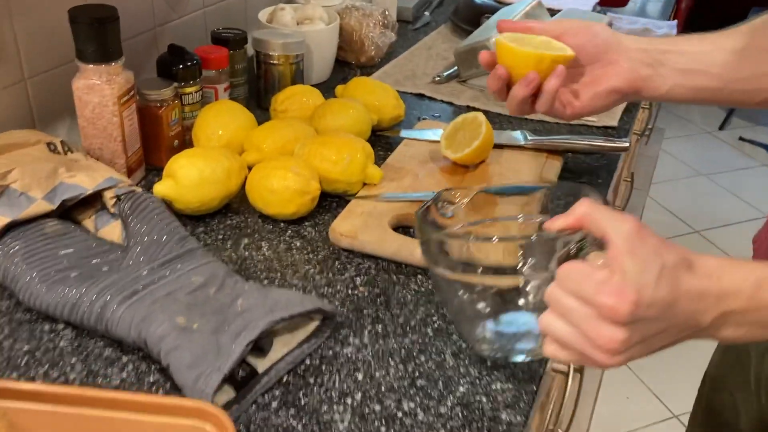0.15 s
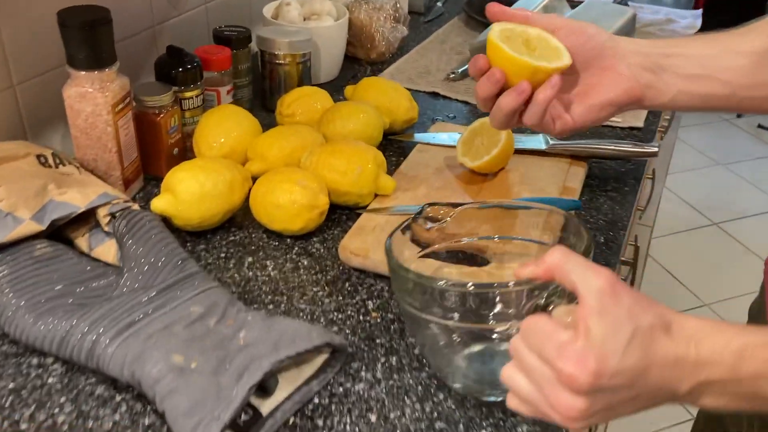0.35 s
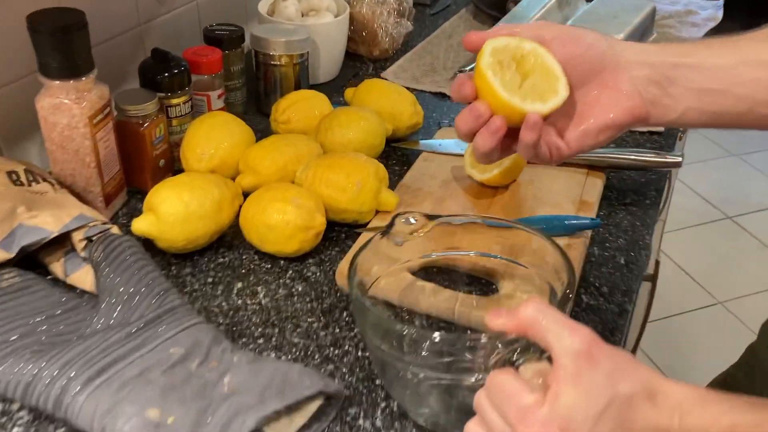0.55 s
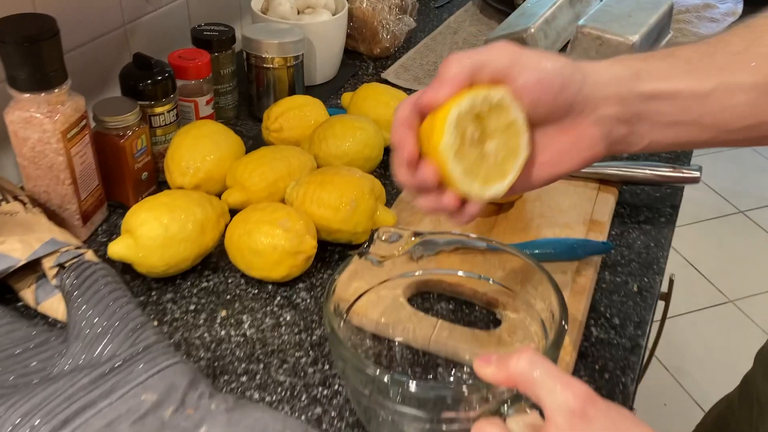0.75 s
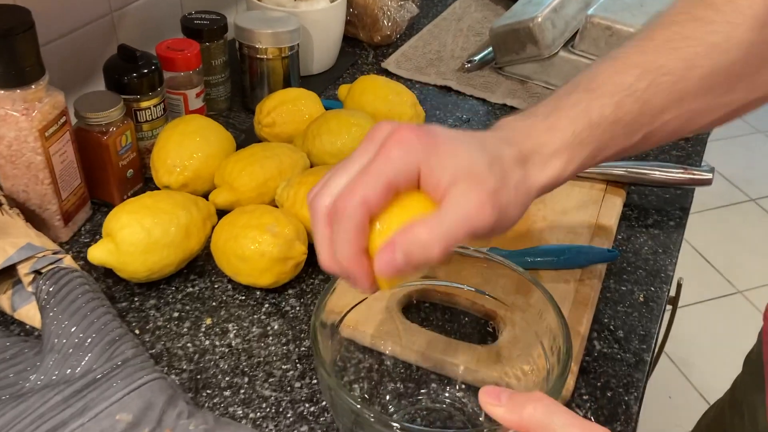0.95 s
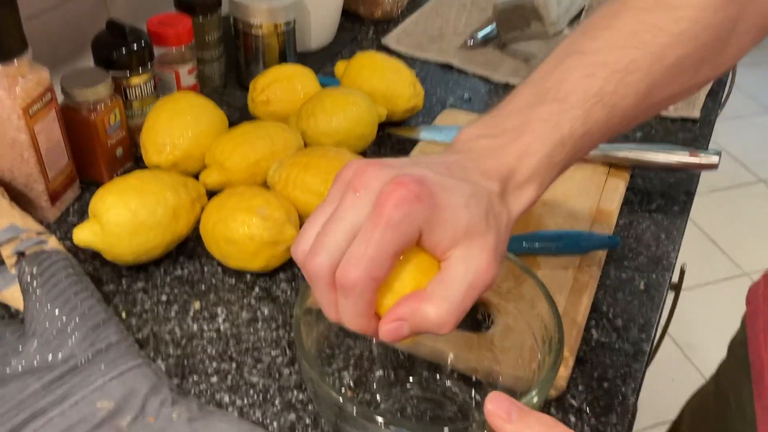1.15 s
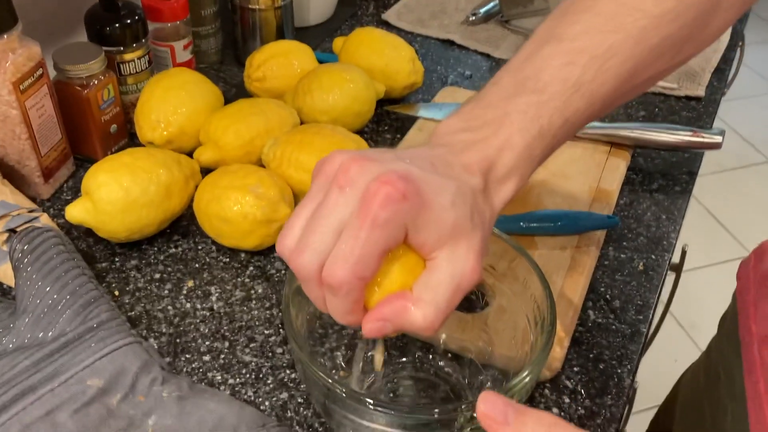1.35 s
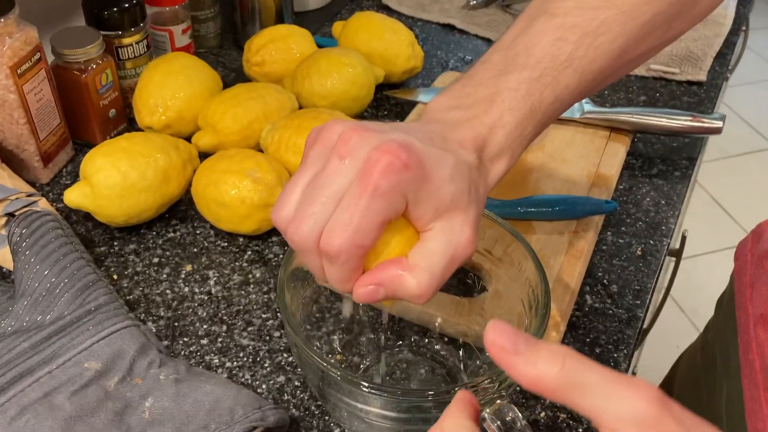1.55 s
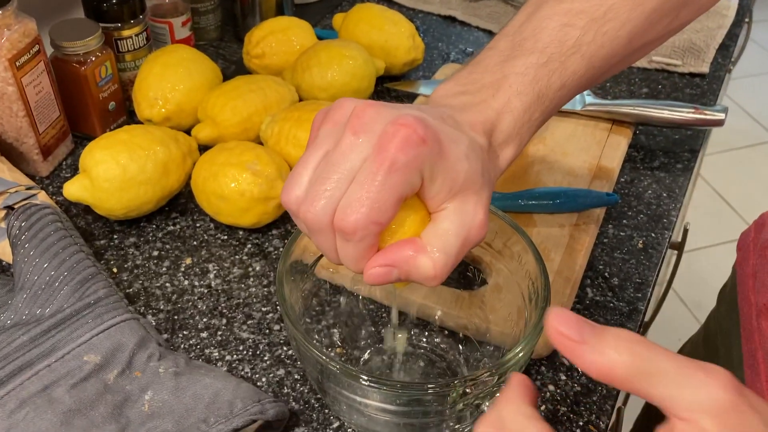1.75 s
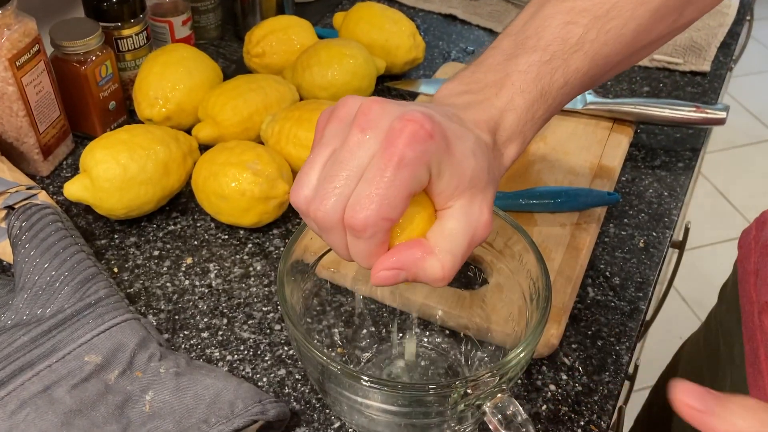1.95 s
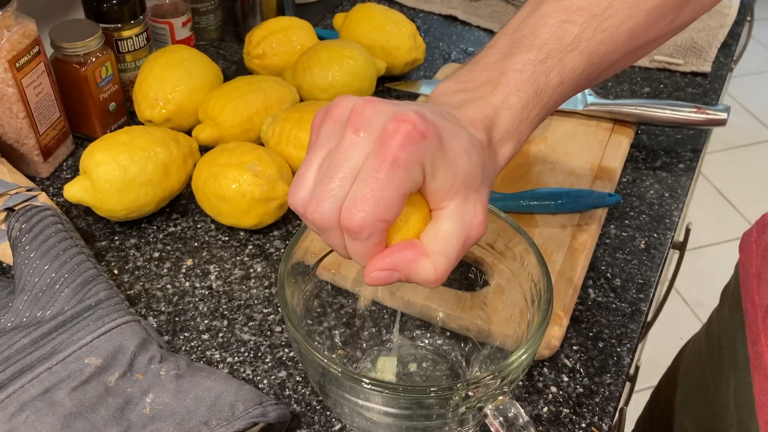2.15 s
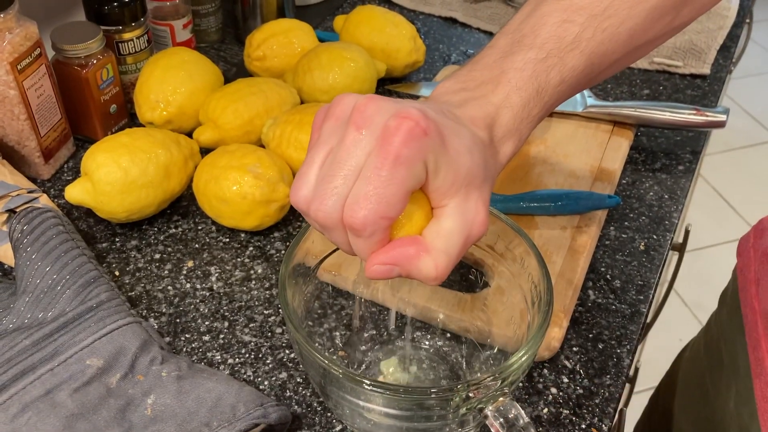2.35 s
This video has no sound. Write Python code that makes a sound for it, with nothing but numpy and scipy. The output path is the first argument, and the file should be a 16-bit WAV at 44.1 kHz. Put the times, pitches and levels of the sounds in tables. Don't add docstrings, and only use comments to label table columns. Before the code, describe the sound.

A lemon is squeezed by hand over a glass cup: first rough sliding and two hard knocks on a stone counter, then quiet wet ticks and small drips, close stereo microphone in an echoing kitchen.

```python
import sys
import numpy as np
from scipy import signal
from scipy.fft import rfft, irfft, next_fast_len
from scipy.io import wavfile
from scipy.ndimage import uniform_filter1d, map_coordinates

SR = 44100
rng = np.random.default_rng(int(sys.argv[2]) if len(sys.argv) > 2 else 0)


def attenuation_scalar(level_db):
    decades = np.asarray(level_db, float) / 20
    return 10 ** decades


def generate_wav(sig):
    pcm = np.round(np.clip(np.atleast_2d(sig).T, -1, 1) * 32767).astype(np.int16)
    wavfile.write(sys.argv[1], SR, pcm)


N = 110250
TIME = np.arange(N) / SR
OPPOSITE = np.array([[1], [-1]])
SIDE_FROM_HZ = 250


def at_hz(points, hz):
    p = np.array(points)
    return np.interp(np.log(hz + 1), np.log(p[:, 0]), p[:, 1])


def over_time(points):
    s, db = np.transpose(points)
    return np.interp(TIME, s, db)


def rms_one(x):
    return x / np.sqrt(np.mean(x ** 2) + 1e-20)


def filtered(x, order, edge_hz, kind):
    return signal.sosfilt(signal.butter(order, edge_hz, kind, fs=SR, output="sos"), x)


def coloured(points, alike):
    hz = np.fft.rfftfreq(N, 1 / SR)
    below, above = (points[0][0] / 2, -80), (points[-1][0] * 1.03, -80)
    colour = attenuation_scalar(at_hz([below] + list(points) + [above], hz))
    apart = np.array([np.ones(len(hz)), hz / np.hypot(hz, SIDE_FROM_HZ)])
    mid, side = irfft(rfft(rng.standard_normal((2, N))) * colour * apart, N)
    alike = np.clip(alike, -1, 1)
    return rms_one(np.sqrt(1 + alike) * mid + np.sqrt(1 - alike) * side * OPPOSITE)


def drift(rate):
    knots = rng.standard_normal(200)
    return map_coordinates(knots, [TIME * rate], order=3)


def ring(x, hz, t60):
    r, w = attenuation_scalar(-60 / (t60 * SR)), 2 * np.pi * hz / SR
    return signal.lfilter([0, np.sin(w)], [1, -2 * r * np.cos(w), r * r], x + 1e-18)


def fade(s, t60):
    t = np.maximum(TIME - s, 0)
    return (1 - np.exp(-(t / .0004) ** 2)) * attenuation_scalar(-60 * t / t60)


def one_band(spectrum, low_hz, high_hz):
    hz = np.fft.rfftfreq(N, 1 / SR)
    return irfft(spectrum * (hz >= low_hz) * (hz < high_hz), N)


# (pitch [Hz], lead [radians])
LEFT_LEAD = [(2600, 0), (5000, -3.14), (6300, -6.1), (7600, -6.5), (8400, -9.33), (9650, -9.51),
             (10800, -12.4), (12100, -12.75), (12900, -15.61), (14300, -15.8), (14900, -18.7), (16500, -19)]


def microphone_lead(hz):
    return at_hz(LEFT_LEAD, hz) / 2 * OPPOSITE


# (pitch [Hz], level [dB per Hz])
AIR = [(18, -80), (30, -62), (45, -6), (54, -4.5), (112, -2.5), (151, -23.5), (224, -15), (260, -20.5),
       (301, -31), (2500, -35.5), (4500, -81), (5850, -66), (9900, -120)]
# (pitch [Hz], level [dB per Hz])
AIR_SIDE = [(18, -67), (30, -43), (119, -12), (301, -9.5), (747, -27.5), (996, -18), (6000, -37),
            (7800, -43), (13200, -120)]
# (pitch [Hz], width [Hz], level [dB])
DRONES = [(62.8, 7.5, -43), (113.6, 11.8, -44), (235.3, 8.1, -50)]
# (pitch [Hz], level [dB], right side against left [ratio])
HUM = [(116.5, -45.5, 0.37), (292.5, -55, 0.025), (590, -86, -1.7), (666, -66.5, -2.6), (800, -67, 0.76)]
# (pitch [Hz], level [dB per Hz])
HISS = [(3500, -46), (5000, -3), (6500, -9), (9000, 10), (11000, 6), (13000, -1.5), (15000, 0.5),
        (15900, -21)]


def background():
    mid = attenuation_scalar(-43.5) * coloured(AIR, 0.99)[0]
    side = attenuation_scalar(-54) * coloured(AIR_SIDE, 0.95)[0]
    for hz, width, db in DRONES:
        mid = mid + attenuation_scalar(db) * rms_one(ring(rng.standard_normal(N), hz, 2.13 / width))
    tilt = 0.05
    out = np.array([(1 + tilt) * mid + side, (1 - tilt) * mid - side])
    for hz, db, sign in HUM:
        tone = attenuation_scalar(db + 2.0 * drift(22.5)) * np.sin(2 * np.pi * hz * TIME)
        out += tone * [[1.4], [1.1 * sign]]
    return out + attenuation_scalar(-57 + 1.0 * drift(12.73)) * coloured(HISS, .9995)


# (low edge [Hz], high edge [Hz], changes [per s], shut below this wander [spreads])
PATCHY = [(12900, 13600, 20, -.9), (13600, 14400, 17, -.4), (14400, 15000, 16, 0), (15000, 15500, 14, -.5),
          (15500, 16000, 18, -.3)]


def patchy(hiss):
    mid = rfft(hiss.mean(axis=0))
    for low_hz, high_hz, rate, shut in PATCHY:
        after_knocks = sum(9 * fade(s + .015, .45) for s, _, _ in KNOCKS)
        closed = uniform_filter1d((drift(rate) - after_knocks < shut) * .97, size=500)
        hiss = hiss - closed * one_band(mid, low_hz, high_hz)
    return hiss


# (time [s], level [dB])
SLIDE = [(0, -47.5), (.11, -45.5), (.2, -45), (0.448, -47.5), (0.54, -42), (.572, -37), (.594, -40.5),
         (.62, -37), (0.674, -38), (0.72, -44), (0.77, -45.5), (0.862, -49), (.884, -44), (.9, -41.5),
         (0.979, -47), (1.02, -46), (1.3, -48.5)]
# (pitch [Hz], level [dB per Hz])
SLIDE_COLOUR = [(88, 12), (150, -7.5), (419, -0.5), (533, -6.5), (7580, -39.5), (9000, -45), (11700, -92),
                (19800, -120)]


def slide():
    level_db = over_time(SLIDE) + 0.99 * drift(75)
    return attenuation_scalar(level_db) * coloured(SLIDE_COLOUR, 0.48) * attenuation_scalar([[1.5], [-1.5]])


# (time [s], level [dB])
RUSTLE = [(0, -62), (.13, -53), (.22, -58.5), (.54, -60), (.6, -64), (.674, -51), (.72, -54.5), (.78, -70),
          (.85, -71)]
# (pitch [Hz], level [dB per Hz])
RUSTLE_COLOUR = [(500, -2), (1000, 4.5), (3000, -11), (7500, -11), (9000, -23), (11700, -84)]
# (time [s], peak level [dB], pitch [Hz], 60 dB fade [s])
BUMPS = [
    (0.569, -31, 325, 0.058),
    (.603, -34.5, 459, 0.11),
    (0.881, -27, 312, 0.079),
    (.883, -41, 640, 0.039),
]


def rustle():
    out = attenuation_scalar(over_time(RUSTLE) + 1.8 * drift(45.6)) * coloured(RUSTLE_COLOUR, 0.29)
    for s, db, hz, t60 in BUMPS:
        out = out + attenuation_scalar(db) * fade(s, t60) * np.sin(2 * np.pi * hz * (TIME - s))
    return out


# (delay [s], level [dB])
CONTACTS = [
    [(-.0005, -11), (.002, -5), (.0052, 3.5), (.0145, -9), (.032, -18), (.058, -24)],
    [(-.0005, -11), (.0045, 5.5), (.011, -2.5), (.018, -10), (.031, -12), (.049, -15), (.066, -16)],
]
# (pitch [Hz], level [dB], fade [s], of which 0.3 is the time to die by 60
# dB)
BODIES = [
    [(70.3, -16, 1), (125, -9.5, 0.79), (218.7, -4.5, 0.32), (279, -3, 0.14), (327.4, -3, 0.29),
     (413, -7.5, 0.84), (466, -5, 0.63), (539, -13, 0.34), (611, -12.5, 0.35), (810, -17, 0.41),
     (982, -8, 0.26), (1920, -11, 0.082), (2303, -14, 0.27), (3100, -20, 0.33)],
    [(118.8, -2, 0.39), (214.5, -20, 1), (265, 5, 0.25), (306, 1, 0.23), (333, -16, 0.62),
     (534, -17.5, 0.71), (677, -5.5, 0.33), (954, -0.5, 0.067), (1040, -12, .12), (1147, -14, .15),
     (1270, -11, 0.14), (1747, -9, 0.13), (1980, -21, .12), (2660, -13.5, 0.11)],
]


def struck_body(k, s):
    body = np.zeros((2, N))
    delay, touch_db = np.transpose(CONTACTS[k])
    for hz, mode_db, t60 in BODIES[k]:
        clicks = np.zeros((2, N))
        late = int((hz < 150) * 1.46 * SR / hz)
        lag = rng.integers(0, 12, (2, 1)) + late
        at = ((s + delay) * SR).astype(int) + lag
        clicks[[[0], [1]], at] = attenuation_scalar(touch_db + mode_db + rng.normal(0, 1.7, (2, 1)))
        body += ring(clicks, hz, t60 * 0.3)
    return filtered(body, 1, [5100, 4030][k], "low")


# (pitch [Hz], level [dB per Hz])
RATTLES = [
    [(59, -17), (100, -5.5), (367, 0), (1290, -14), (3200, -22), (7600, -41), (9000, -51), (11700, -106),
     (19800, -120)],
    [(59, -14), (100, -33), (298, 0), (1130, -21.5), (2230, -39.5), (4480, -57), (9000, -69), (11700, -84),
     (19800, -120)],
]


def rattle(k, s):
    rattle_db, rattle_t60 = [-7, -3.5][k] - 5.0, [0.065, 0.041][k]
    tail_db, tail_t60 = [-25, -22][k], [0.95, 0.19][k]
    crack_db, crack_t60 = [-5, -2][k], [0.007, 0.049][k]
    bounces = sum(attenuation_scalar(db) * fade(s + delay, rattle_t60) for delay, db in CONTACTS[k])
    burst = attenuation_scalar(rattle_db) * bounces + attenuation_scalar(tail_db) * fade(s, tail_t60)
    noise = coloured(RATTLES[k], 0.21)
    bright = rms_one(filtered(noise, 2, 945, "high"))
    return burst * noise + attenuation_scalar(crack_db) * fade(s - .001, crack_t60) * bright


# (which knock, pitch [Hz], level [dB], 60 dB fade [s])
GLASS = [
    (0, 3977, -25.5, 0.29),
    (0, 7020, -46, 0.4),
    (1, 4430, -31, 0.087),
    (0, 6200, -57.5, .3),
    (0, 2500, -43, 0.82),
    (1, 997, -32.5, 1),
]


def glass_ring(k, s):
    out = np.zeros((2, N))
    for which, hz, db, t60 in GLASS:
        if which == k:
            out += attenuation_scalar(db) * fade(s, t60) * np.sin(2 * np.pi * hz * TIME + np.array([[0], [.8]]))
    return out


# (time [s], peak level [dB], left over right [dB])
KNOCKS = [
    (0.24, -4.5, 5),
    (0.913, -8.5, 3),
]


def knocks():
    out = np.zeros((2, N))
    for k, (s, db, pan_db) in enumerate(KNOCKS):
        hit = attenuation_scalar([-8, -14.5][k]) * struck_body(k, s) + rattle(k, s) + glass_ring(k, s)
        hit = filtered(hit, 2, [40, 9000], "band")
        hit += attenuation_scalar(-37) * fade(s, 0.046) * rng.standard_normal(N)
        low = filtered(hit, 1, 1800, "low")
        out += attenuation_scalar(db) * (hit + (attenuation_scalar(pan_db / 2 * OPPOSITE) - 1) * low)
    return out


# (time [s], level [dB])
FIZZ = [(1.1, -68), (1.21, -56), (1.268, -59.5), (1.359, -55.5), (1.45, -61.5), (1.5, -66.5), (1.97, -67.5),
        (2.07, -59.5), (2.14, -64), (2.198, -57), (2.28, -70), (2.36, -57), (2.45, -63.5)]


def fizz():
    bursts = rng.random(N) < 4000 / SR
    sizes_db = 3.0 * np.minimum(rng.exponential(1, N), 4)
    pops = bursts * attenuation_scalar(sizes_db) * rng.choice([-1, 1], N)
    dealt = rng.integers(0, 16, N)
    pitches = np.geomspace(2200, 8000, 16)
    rings = sum(ring(pops * (dealt == k), hz, 2.4 / hz) for k, hz in enumerate(pitches))
    return attenuation_scalar(over_time(FIZZ)) * rms_one(rings)


# (time [s], peak level [dB], centre pitch [Hz], broad part [dB])
TICKS = [(1.2096, -45, 1900, 8), (1.274, -52, 6500, 0), (1.296, -55, 6360, 13), (1.3403, -40, 4450, 4),
         (1.3615, -46, 7900, -6), (1.3712, -35.5, 8860, 2), (1.378, -47, 8050, -7),
         (1.4261, -34.5, 14900, 1.5), (1.4545, -42, 11000, 2), (1.5054, -47, 14500, 0),
         (1.5658, -25, 9500, -17), (1.5917, -39.5, 11300, 0), (1.785, -46, 12000, -3),
         (1.845, -42.5, 8800, 6), (1.9145, -41, 11900, -6), (1.9903, -37, 11650, -9), (2.004, -48, 8300, 6),
         (2.034, -40, 4750, 0), (2.047, -37, 8600, -2), (2.0616, -37.5, 9600, 5), (2.071, -37.5, 4360, -2),
         (2.0786, -37.5, 10500, 5.5), (2.0914, -43, 11900, -4), (2.104, -53, 8000, 7),
         (2.199, -44, 8470, -7), (2.2033, -41, 11900, 7.5), (2.2542, -29, 9600, -10),
         (2.269, -42, 13500, -2), (2.319, -49, 7840, -8), (2.3465, -41, 13900, 1), (2.355, -45.5, 6950, 0),
         (2.4074, -50, 7500, -2.5), (2.472, -50, 12400, -6), (2.4837, -37.5, 10450, -4)]


def pulp_ticks():
    out, n = np.zeros((2, N + 4000)), np.arange(4000) / SR
    for s, db, hz, broad_db in TICKS:
        noise = rng.standard_normal(4000) + .55 * rng.standard_normal((2, 4000))
        noise = noise * attenuation_scalar(-60 * n / 0.03)
        wide = 0.21
        edges = [hz * (1 - wide / 2), min(hz * (1 + wide / 2), 17000)]
        tick = filtered(noise, 2, edges, "band")
        broad = filtered(noise, 1, 1800, "high")
        tick = tick / abs(tick).max() + attenuation_scalar(broad_db) * broad / abs(broad).max()
        start = int(s * SR)
        out[:, start:start + 4000] += attenuation_scalar(db + 0.5) * tick
    return out[:, :N]


# (time [s], peak level [dB], pitch [Hz])
DROPS = [(1.1773, -44, 2780), (1.3727, -42, 3340), (1.3715, -40, 5030), (1.3834, -41.5, 2830),
         (1.432, -43, 2850), (1.432, -43.5, 1795), (1.458, -51, 2790), (2.084, -38, 6100),
         (2.1036, -33.5, 3220), (2.189, -42, 4000), (2.354, -35, 4920), (2.376, -39.5, 2670)]


def drops():
    out, n = np.zeros((2, N + 4000)), np.arange(4000) / SR
    for s, db, hz in DROPS:
        t60 = 85 / hz
        rising = n + .04 * n ** 2 / t60
        sine = np.sin(2 * np.pi * hz * rising - microphone_lead(hz))
        sine = sine * (1 - np.exp(-n / 0.00076))
        splash = filtered(rng.standard_normal(4000), 1, [hz * .88, hz * 1.25], "band")
        sine += attenuation_scalar(-10) * rms_one(splash)
        start = int(s * SR)
        out[:, start:start + 4000] += attenuation_scalar(db - 2 - 60 * n / t60) * sine
    return out[:, :N]


def room_echo(x):
    t60, wall_hz = 0.38, 3870
    size = next_fast_len(N + SR)
    hz = np.fft.rfftfreq(size, 1 / SR)
    dull, out = 1 / (1 + 1j * hz / wall_hz), np.zeros((2, len(hz)), complex)
    for k, lag in enumerate(rng.uniform(.011, .04, 16)):
        loop = attenuation_scalar(-60 * lag / t60) * dull * np.exp(-2j * np.pi * hz * lag)
        out[k % 2] += loop / (1 - loop) * (-1) ** (k // 2)
    out -= (out - out.mean(axis=0)) * SIDE_FROM_HZ / np.hypot(hz, SIDE_FROM_HZ)
    return irfft(out * rfft(x, size) / np.hypot(1, (hz / 6000) ** 2), size)[:, :N]


def scene():
    squeeze = (fizz() + pulp_ticks() + drops()) * attenuation_scalar(.1 * OPPOSITE)
    near = slide() + rustle() + knocks() + squeeze
    return near + attenuation_scalar(-14.5) * room_echo(near.mean(axis=0)) + patchy(background())


# (low edge [Hz], high edge [Hz], needed over usual level [dB])
HOLES = [(4150, 4500, -1.5), (4800, 5150, -1.5), (5500, 5750, -1), (5900, 6200, -1.5), (8450, 8950, 4),
         (8950, 9600, 5), (12950, 13700, 4), (13700, 14350, .5)]


def holes(x):
    mid = rfft(x.mean(axis=0))
    for low_hz, high_hz, pass_db in HOLES:
        band = one_band(mid, low_hz, high_hz)
        level = np.sqrt(uniform_filter1d(band ** 2, size=1100) + 1e-20)
        faint = 1. * (level < attenuation_scalar(pass_db) * np.median(level))
        x = x - band * uniform_filter1d(faint, size=300)
    return x


def band_limit(x):
    return signal.sosfilt(signal.butter(12, 16960, fs=SR, output="sos"), x)


def record(dry):
    hz = np.fft.rfftfreq(N, 1 / SR)
    rounded = 1.6 * np.tanh(dry / 1.6)
    reach = (hz < 16000) / (1 + (34 / (hz + 1)) ** 4)
    x = irfft(rfft(rounded) * np.exp(1j * microphone_lead(hz)) * reach, N)
    return band_limit(holes(x))


dry = scene()
out = record(dry)
generate_wav(out)
```